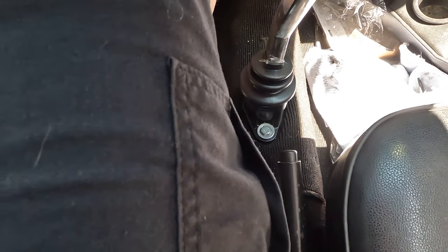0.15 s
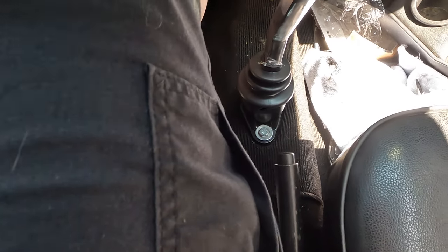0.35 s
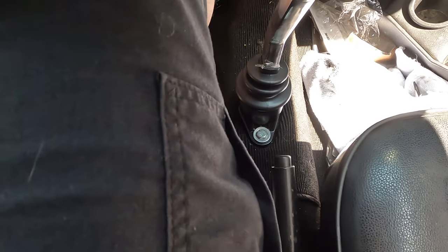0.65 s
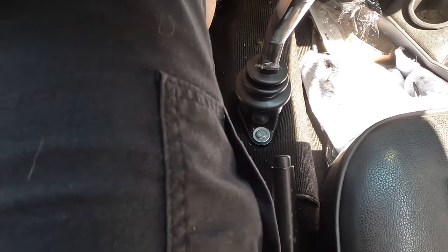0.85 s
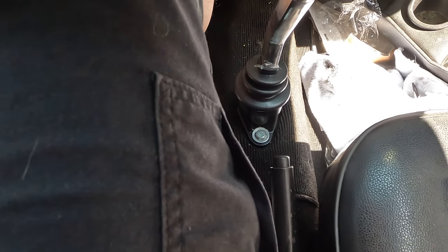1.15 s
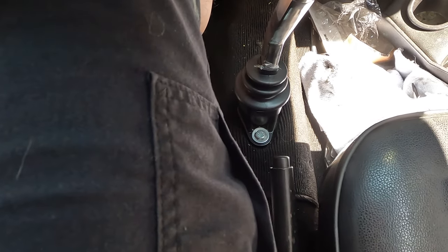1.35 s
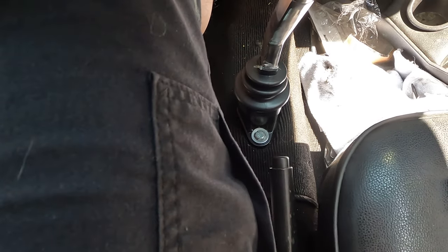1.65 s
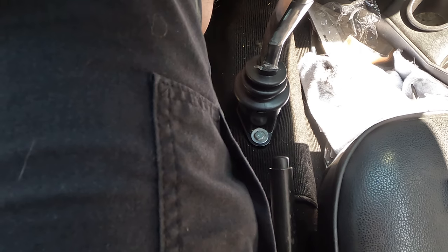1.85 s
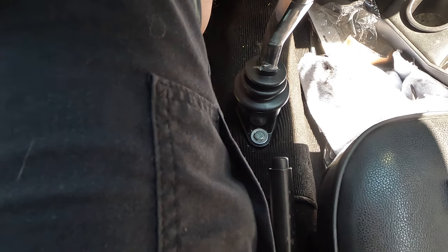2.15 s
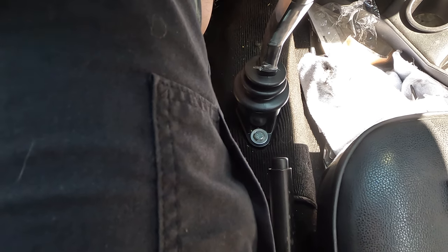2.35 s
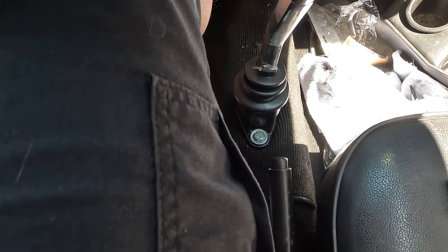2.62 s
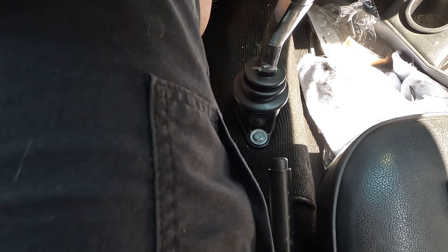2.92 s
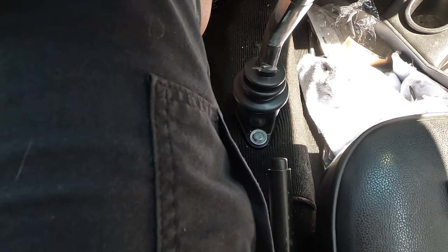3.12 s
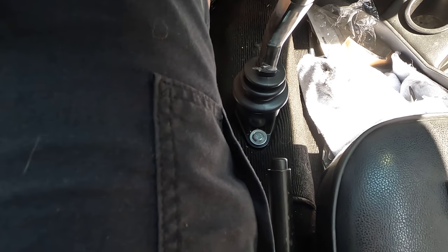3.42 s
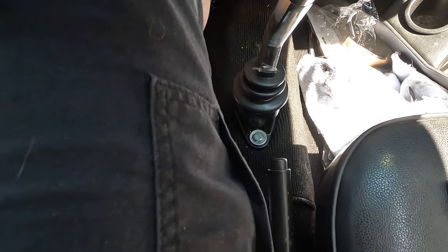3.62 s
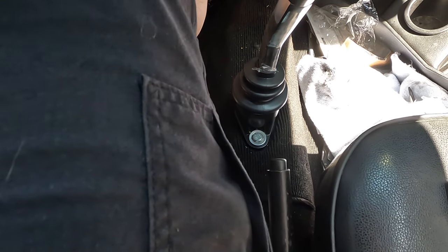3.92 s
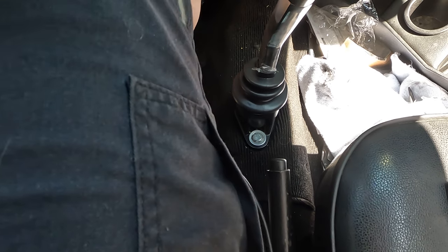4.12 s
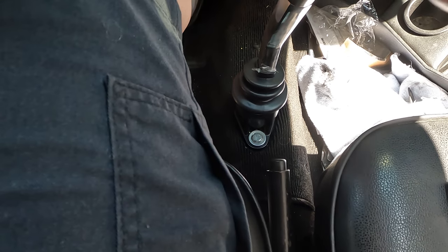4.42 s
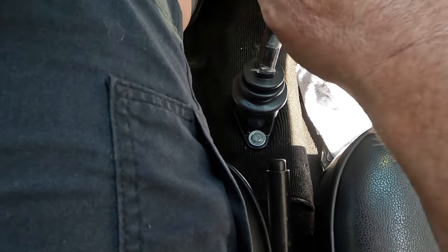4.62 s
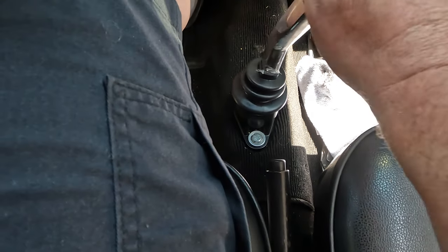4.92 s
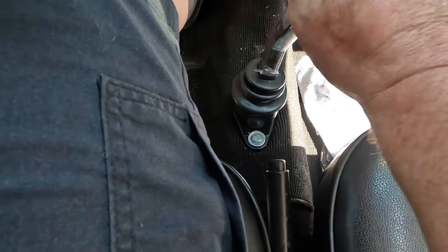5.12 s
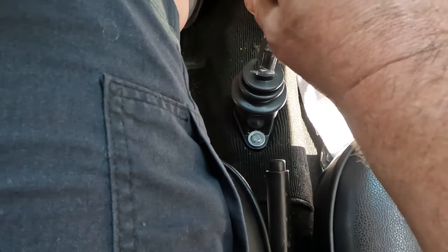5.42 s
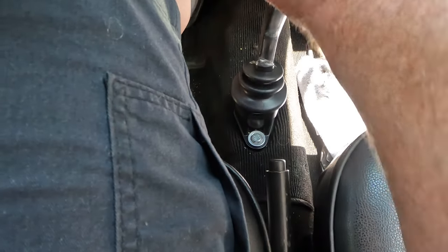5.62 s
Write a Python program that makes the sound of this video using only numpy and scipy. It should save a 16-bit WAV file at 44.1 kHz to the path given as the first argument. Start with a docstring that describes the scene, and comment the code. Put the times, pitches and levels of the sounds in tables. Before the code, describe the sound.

A low, muffled street rumble fills the cabin of a parked car. During the first second the driver settles with a few soft thumps and light taps. From about 1.2 seconds keys click and jingle in the ignition, close and slightly left. At 1.5 seconds the starter clunks in and grinds with a hoarse whine for half a second, then winds down without starting the engine. The keys clink again at 2 seconds, then rattle and jingle brightly, louder, from about 2.5 to 3.1. At 3.2 seconds the starter clunks and grinds a second time, and the four-cylinder engine catches at about 3.5. It flares briefly around 3.9 seconds, then sinks by 4.7 into a low, throbbing idle that continues to the end, near 5.8 seconds. One light, hollow tap comes at about 5 seconds. The space sounds small and dry.

```python
"""Inside a parked car, street rumble fills the cabin. The driver settles, and soft blows ring the floor pan.
Keys jingle and click in the lock, each impact exciting the modes of thin steel. The starter clunks in and
grinds in vain, its gear teeth driving the housing into resonance. The key is worked again, and on the
second try a four-cylinder engine catches, flares and idles: a pulse train filtered by the exhaust pipe."""
import sys
import numpy as np
from scipy import signal
from scipy.fft import rfft, irfft, next_fast_len
from scipy.io import wavfile
from scipy.ndimage import uniform_filter1d, map_coordinates

SR = 44100
rng = np.random.default_rng(int(sys.argv[2]) if len(sys.argv) > 2 else 0)


def dump(signal):
    """Clip the signal to [-1, 1] and save it as 16-bit WAV at the path in sys.argv[1]."""
    limited = np.clip(np.atleast_2d(signal).T, -1, 1)
    pcm = np.round(limited * 32767).astype(np.int16)
    wavfile.write(sys.argv[1], SR, pcm)


N = 254456


def amp(db):
    """Decibels to amplitude ratio."""
    return 10 ** (np.asarray(db) / 20)


def unit(x):
    """Normalisation to rms 1."""
    return x / np.sqrt(np.mean(x ** 2) + 1e-20)


def along(points, hz):
    """Interpolation on a logarithmic frequency axis."""
    f, v = np.transpose(points)
    return np.interp(np.log(hz + 1), np.log(f + 1), v)


def curves(rows):
    """Linear interpolation in time, one curve per column."""
    s, *cols = np.transpose(rows)
    return [np.interp(np.arange(N) / SR, s, c) for c in cols]


def during(t0, t1, fade=0.016):
    """A gate with linear ramps."""
    t = np.arange(N) / SR
    return np.clip(np.minimum(t - t0, t1 - t) / fade, 0, 1)


def wobble(rate):
    """Smooth random modulation, rate knots a second."""
    return map_coordinates(rng.standard_normal(int(N * rate / SR) + 4), [np.arange(N) * rate / SR])


def filtered(x, response):
    """Linear filtering: the spectrum times a frequency response."""
    m = next_fast_len(x.shape[-1] + SR // 4)
    return irfft(rfft(x, m) * response(np.fft.rfftfreq(m, 1 / SR)), m)[..., :x.shape[-1]]


def resonant(modes, passes=1):
    """Modal superposition of (frequency, bandwidth, gain) resonances, cascaded passes times."""
    return lambda f: sum((-1) ** k * amp(db) * 1j * f * width / (hz * hz - f * f + 1j * f * width)
                         for k, (hz, width, db) in enumerate(modes)) ** passes


def grit(t):
    """Partly coherent stereo white noise."""
    return rng.standard_normal(len(t)) + .5 * rng.standard_normal((2, len(t)))


# Likeness of left and right in the cabin: (frequency [Hz], correlation [ratio])
COHERENCE = [(40, 0.97), (100, .998), (500, 0.89), (1500, 0.6), (8000, 0.62), (15000, 0.32)]
def rush(spectrum, patchy_db, coherence=COHERENCE):
    """Shaped noise of rms 1 with patches of random gain; the mid-side ratio sets its coherence."""
    bins = signal.stft(rng.standard_normal((2, N)), nperseg=512)[2]
    patches = uniform_filter1d(uniform_filter1d(rng.standard_normal(bins.shape[1:]), 6, 0), 10, 1)
    pair = signal.istft(bins * amp(patchy_db * unit(patches)), nperseg=512)[1][:, :N]
    turn = lambda hz: np.arccos(np.clip(along(coherence, hz), -1, 1)) / 2
    mid, side = filtered(pair, lambda hz: amp(along(spectrum, hz)) * [np.cos(turn(hz)), np.sin(turn(hz))])
    return unit(np.array([mid + side, mid - side]))


# Street noise; the hiss also swells as the key is worked: (time [s], rumble level [dB], hiss level [dB])
STREET_LEVELS = [(0, -25, -46), (.8, -28, -54), (1.15, -29, -60), (1.5, -28, -43.5), (2.3, -29.5, -69),
                 (3.1, -25.5, -32.5)]
# Spectra of the rumble and the hiss: (frequency [Hz], relative density [dB])
RUMBLE_SPECTRUM = [(12, -53.5), (20, -5), (76, -5), (136, -15.5), (498, -35), (990, -33), (1900, -47),
                   (3300, -120)]
HISS_SPECTRUM = [(410, -0.5), (700, -15.5), (2590, -13.5), (4520, -17.5), (12000, -34.5), (15500, -59)]
def street():
    """Transmission through the body favours the bass of distant traffic; it fades as the engine starts."""
    rumble_db, hiss_db = curves(STREET_LEVELS)
    rumble = amp(rumble_db) * rush(RUMBLE_SPECTRUM, patchy_db=2.5) * during(-1, 3.57, fade=0.13)
    hiss = amp(hiss_db) * rush(HISS_SPECTRUM, patchy_db=2.5) * during(-1, 3.25, fade=0.023)
    return rumble + hiss


def cabin(x):
    """Reverberation: absorbent upholstery leaves only a brief exponential tail."""
    t = np.arange(SR // 6) / SR
    tail = rng.standard_normal((2, len(t))) * amp(-60 * t / .09)
    return signal.fftconvolve(x, tail / np.linalg.norm(tail[0]), axes=1)[:, :N]


# Light taps on trim and lever: (time [s], peak level [dB], pitch [Hz])
TRIM_TAPS = [(.074, -24.5, 585), (0.13, -32, 2600), (0.281, -37, 1990), (1.32, -25.5, 401),
             (4.952, -23.5, 438), (5.466, -44, 6200)]
def taps():
    """Damped resonance: a brief rough contact rings a hollow note and a broad overtone."""
    out, t = np.zeros(N + SR), np.arange(SR // 8) / SR
    for s, db, hz in TRIM_TAPS:
        contact = amp(-60 * t / 0.073) * rng.standard_normal(len(t))
        note = filtered(contact, resonant([(hz, .16 * hz, 0), (2.3 * hz, 2.6 * hz, -9.5)], passes=2))
        out[round(s * SR):][:len(t)] += amp(db) * note / np.abs(note).max()
    return out[:N]


# Soft blows on seat, pedal and floor: (time [s], gain [dB], thud gain [dB], rasp gain [dB])
DRIVER_BLOWS = [(0.071, -23.5, 8.5, -14.5), (0.37, -22, -4, -13.5), (0.593, -24, 3.5, -22.5),
                (0.909, -30, -14, -11.5), (0.936, -17.5, 11.5, -26), (1.267, -33.5, -13, -5),
                (1.316, -34, -16, -0.5), (2.664, -26.5, -10, -2)]
# Floor pan modes: (frequency [Hz], bandwidth [Hz], gain [dB])
PAN_MODES = [(91, 6.9, 0), (211, 70, 1), (307.7, 38.5, 4.5), (426, 36, -1), (614, 20, -6.5)]
# Rough contact, in blows and gear teeth alike: (frequency [Hz], relative density [dB])
GRIND_SPECTRUM = [(100, -46.5), (330, -7.5), (580, -18.5), (1150, -14.5), (2400, -20.5), (6500, -25.5),
                  (8200, -35), (15600, -41.5)]
def thumps(blows):
    """Impact excitation of the floor pan: its lowest mode thuds, and harder blows rasp more brightly."""
    out, t = np.zeros((2, N + SR)), np.arange(SR // 4) / SR
    envelope = amp(-60 * t / 0.15) * (1 - np.exp(-t / 0.0022))
    upper_modes = lambda hz: resonant(PAN_MODES[1:])(hz) / (1 + 1j * hz / 900) ** 2
    for s, db, thud_db, rasp_db in blows:
        push = envelope * rng.standard_normal(len(t))
        knock = amp(-16) * unit(filtered(push, upper_modes))
        thud = amp(thud_db - 19.5) * unit(filtered(envelope ** 3, resonant(PAN_MODES[:1])))
        cutoff_hz = 3500 * amp(db + 20.5)
        dull = lambda hz: amp(along(GRIND_SPECTRUM, hz)) * (hz > 400) / (1 + (hz / cutoff_hz) ** 2)
        rasp = amp(rasp_db + 4.5 + np.array([[1], [-1]])) * envelope * unit(filtered(grit(t), dull))
        out[:, round(s * SR):][:, :len(t)] += amp(db) * (knock + thud + rasp)
    return out[:, :N]


# Two groups of key modes: (frequency [Hz], relative level [dB], nominal 60 dB decay time [s])
LOW_KEY_MODES = [(4870, -9, .05), (6150, -5, .04), (7110, 0, .07)]
HIGH_KEY_MODES = [(10450, 0, .08), (10800, -1, .07), (11900, -4, .04), (13650, -8, .05), (14880, -5, .06)]
def chime(modes, t):
    """Free vibration of thin steel, new at each strike and roughened by re-touches, over a clatter."""
    decay_scale = amp(rng.normal(-2, 2))
    strike_db = rng.normal(0, 5, len(modes))
    ring = 0
    for (hz, db, t60), extra_db in zip(modes, strike_db):
        cycles = hz * rng.normal(1, 0.0164) * t + rng.random((2, 1)) * hz / 40000
        ring += amp(db + extra_db - 60 * t / (t60 * decay_scale)) * np.sin(2 * np.pi * cycles)
    tremble = .7 + np.interp(t, t[::80], rng.standard_normal(len(t[::80])))
    clatter = unit(filtered(grit(t), resonant([(hz, 1100, db / 2) for hz, db, _ in modes], passes=2)))
    return ring * tremble / np.abs(ring).max() + amp(-6 - 60 * t / 0.061) * clatter


# The bunch swings loose: (start [s], end [s], gain [dB])
KEY_SWINGS = [(2.025, 2.35, -70), (2.662, 2.875, -49.5), (2.93, 3.205, -47.5)]
def jingle(touches_per_s=300, bandwidth_hz=340):
    """Random impacts, in clumps, ring key modes broadened by the damping of neighbouring keys."""
    level = sum(amp(db) * during(t0, t1, 0.013) for t0, t1, db in KEY_SWINGS)
    out = 0
    for hz, db, _ in LOW_KEY_MODES + HIGH_KEY_MODES:
        touches = (rng.random(N) < touches_per_s / SR) * rng.standard_normal(N)
        clumped = touches * amp(6 * wobble(60))
        out += amp(db) * unit(filtered(clumped, resonant([(hz, bandwidth_hz, 0)], passes=2)))
    return level * out * amp([[2], [-2]])


# Key and lock contacts: (time [s], rattle gain [dB], low chime gain [dB], high chime gain [dB])
KEY_CONTACTS = [(0.126, -21.5, -36, -47), (0.3107, -22.5, -47, -66), (1.1666, -21, -18.5, -37),
                (1.18, -17.5, -21, -29), (1.199, -26, -25, -20.5), (1.286, -24.5, -29, -31.5),
                (1.3138, -12.5, -23, -46), (1.412, -22, -26.5, -37), (1.4763, -17.5, -32, -35),
                (2.061, -24, -19, -23.5), (2.1236, -23.5, -31, -34.5), (2.4636, -25, -61, -70),
                (2.5602, -15, -42, -51), (2.657, -16.5, -39, -37), (2.6825, -14.5, -13.5, -28),
                (2.7036, -9, -33, -35), (2.7385, -21.5, -34, -38), (2.767, -20.5, -40, -36),
                (2.805, -17, -7, -27), (2.843, -11.5, -12.5, -22.5), (2.9272, -16, -14, -22),
                (3.0079, -2, -15, -22), (3.029, -7, -15, -16), (3.074, -9, -19, -18.5),
                (3.114, -6.5, -13.5, -20), (3.138, -40, -33, -15)]
# Their rattle: (frequency [Hz], relative density [dB])
RATTLE_SPECTRUM = [(700, -5.5), (1300, -5), (2700, -5.5), (4800, -10.5), (6500, -17.5), (13000, -31.5)]
# Hard knocks of key on key or lock: (time [s], peak level [dB], pitch [Hz])
KEY_KNOCKS = [(2.466, -29, 2700), (2.563, -26.5, 2650), (2.6866, -17, 3500), (2.7075, -23, 2740),
              (2.7435, -18, 6500), (2.8073, -5, 5370), (2.9272, -21, 6560), (3.008, -17, 2900),
              (3.022, -12, 5130), (3.1172, -11, 6800)]
def keys():
    """Impact sound, a little to the left: a broadband rattle and modal ringing; hard knocks add a tick."""
    out, t = np.zeros((2, N + SR)), np.arange(SR // 6) / SR
    rise = (1 - np.exp(-t / 0.0026)) ** 2
    for s, rattle_db, low_db, high_db in KEY_CONTACTS:
        noise = unit(filtered(grit(t), lambda hz: amp(along(RATTLE_SPECTRUM, hz))))
        rattle = amp(rattle_db - 14.5 - 60 * t / 0.075) * noise
        low = amp(low_db - 7.5) * chime(LOW_KEY_MODES, t)
        high = amp(high_db + np.array([[2.5], [-1]])) * chime(HIGH_KEY_MODES, t)
        out[:, round(s * SR):][:, :len(t)] += rise * (rattle + low + high) * amp([[.8], [-.8]])
    for s, db, hz in KEY_KNOCKS:
        snap = amp(-60 * t / .005) * rng.standard_normal(len(t))
        tick = filtered(snap, resonant([(hz, .33 * hz, 0)], passes=2))
        out[:, round(s * SR):][:, :len(t)] += amp(db) * tick / np.abs(tick).max()
    return out[:, :N]


# Tries at the starter:
# (pinion touch [s], slam [s], slam gain [dB], motor surge [s], key release [s], grind gain [dB])
START_TRIES = [(1.519, 1.533, -9, 1.865, 1.968, -35), (3.163, 3.173, -9, 3.355, 3.716, -42)]
def pinion_blows():
    """Impact and rebound: the pinion touches, slams home and bounces, giving rows for thumps()."""
    blows = []
    for touch, slam, db, *_ in START_TRIES:
        blows += [(touch, db - 6.5, -1, -10), (slam, db, 0.57, -12), (slam + .02, db - 10, 11, -26.5)]
    return blows


def cranking(surge_db=9, settle_s=0.1, drop_out_db=-6, coast_db_per_s=-57, jolt_t60_s=1):
    """Exponential decay of grind and shake: the motor surges, settles and coasts; a slam jolts the block."""
    t = np.arange(N) / SR
    grind, jolt = np.zeros(N), np.zeros(N)
    for touch, slam, slam_db, surge, release, db in START_TRIES:
        free_db = surge_db * during(surge, 9, 0.017) * np.exp(-np.clip(t - surge, 0, None) / settle_s)
        coast_db = drop_out_db * during(release, 9, .04) + coast_db_per_s * np.clip(t - release, 0, None)
        grind += during(touch, 9) * amp(db + free_db + coast_db)
        jolt += during(slam, 9, 0.018) * amp(slam_db - 6 - 60 * np.abs(t - slam) / jolt_t60_s)
    return grind, np.hypot(jolt, amp(9.5) * grind)


# Starter motor whine: (time [s], frequency [Hz])
MOTOR_PITCH = [(1.68, 303.3), (1.8, 400), (1.95, 433.3), (3.3, 577), (3.38, 542), (3.45, 400.4)]
# Shaking engine block: (frequency [Hz], relative density [dB])
SHUDDER_SPECTRUM = [(12, -18.5), (20, -5), (103, 4.5), (166, -14), (320, -20), (550, -120)]
# Starter housing modes: (frequency [Hz], gain per pass [dB])
HOUSING_MODES = [(583, 0.5), (786, -6.5), (1004, -1), (1175, -3)]
def starter():
    """Forced vibration: teeth grind and ring the housing, block and floor pan shake, the motor whines."""
    level, shake = cranking()
    teeth = amp(1.8 * wobble(250))
    grind = amp(3.5 + np.array([[.8], [-.8]])) * unit(teeth * rush(GRIND_SPECTRUM, patchy_db=1))
    shudder = rush(SHUDDER_SPECTRUM, patchy_db=2.5)
    swell = amp(2.5 * wobble(16))
    hum = amp(-8) * swell * unit(filtered(rng.standard_normal(N), resonant(PAN_MODES[1:], passes=2)))
    phase = 2 * np.pi * np.cumsum(curves(MOTOR_PITCH)[0]) / SR
    whine = amp(-1.5) * unit(wobble(30) * np.sin(phase))  # random modulation makes it hoarse
    housing = resonant([(hz, 34, db) for hz, db in HOUSING_MODES], passes=2)
    ring = amp(-5) * unit(swell * filtered(teeth * rng.standard_normal(N), housing))
    return level * (grind + whine + ring) + shake * (hum + shudder)


# Uneven exhaust branches, one per cylinder: (relative level [dB])
BRANCH_LEVELS = [12, 2.5, 11.3, 11.2]
# Exhaust pipe modes: (frequency [Hz], bandwidth [Hz], gain [dB])
PIPE_MODES = [(85.2, 22.8, 5), (168.9, 16, 0), (280, 14, -25)]
def exhaust(firings, jitter_s=.0008, echo_s=.029):
    """Pipe resonance: each firing sends a pulse and its tail-pipe reflection through a low-pass silencer."""
    onsets = np.flatnonzero(np.diff(np.floor(firings)))
    size_scatter, time_scatter, echo_scatter = rng.standard_normal((len(onsets), 3)).T
    cylinder = np.floor(firings[onsets + 1]).astype(int) % 4
    size = amp(np.take(BRANCH_LEVELS, cylinder) + 1.5 * size_scatter)
    pulses = np.zeros(N + SR)
    pulses[onsets + np.round(time_scatter * jitter_s * SR).astype(int)] = size
    pulses[onsets + round(echo_s * SR)] += 0.42 * size * amp(2 * echo_scatter)
    return unit(filtered(pulses[:N], lambda hz: resonant(PIPE_MODES)(hz) / (1 + 1j * hz / 260) ** 2))


# Catch, flare and idle: (time [s], firing rate [Hz], boom level [dB])
ENGINE_RUN = [(3.471, 32, -13), (3.738, 39, -21), (3.831, 45.2, -23.5), (3.948, 44.3, -19),
              (4.079, 39.5, -18), (4.27, 33.1, -19.5), (4.669, 25.2, -18.5), (4.794, 24.9, -21.5),
              (5.198, 26.8, -16.5), (5.77, 30, -19)]
# Spectra of the valve gear and of a leak: (frequency [Hz], relative density [dB])
VALVE_SPECTRUM = [(110, -52), (200, -4.5), (440, -13.5), (900, -24.5), (2050, -29.5), (2500, -32),
                  (3180, -32), (3800, -37.5), (8000, -49), (10000, -71.5)]
LEAK_SPECTRUM = [(5500, -6), (11500, -9), (12200, 0), (13000, -9), (14500, -7)]
def engine(idle_hz=30, strong_firing_s=5.092):
    """Periodic combustion booms at the firing rate; exhaust, valves and leak grow with speed and effort."""
    catch_s = ENGINE_RUN[0][0]
    rate, boom_db = curves(ENGINE_RUN)
    effort = uniform_filter1d(np.gradient(rate) * SR, round(.08 * SR))  # smoothed acceleration [Hz/s]
    bark_db = -19.5 + 0.075 * (rate - idle_hz) + 0.078 * effort
    bark_db -= 8 * during(-1, catch_s + 0.22, 0.047)  # the first firings are weak
    valve_db = -37 + 0.28 * (rate - idle_hz) + 0.093 * effort
    firings = np.cumsum(rate) / SR
    firings -= firings[round(strong_firing_s * SR)]
    bark = amp(bark_db) * exhaust(firings)
    sway = amp(2.8 * wobble(15))
    boom = amp(boom_db) * sway * np.sqrt(2) * np.sin(2 * np.pi * (firings - .12))
    valves = amp(valve_db) * rush(VALVE_SPECTRUM, patchy_db=2, coherence=[(100, 1.0)])
    puffs = amp(4.5 * np.cos(np.pi * firings / 2) + wobble(6))  # once every four firings
    leak = amp(valve_db - 26) * unit(puffs * rush(LEAK_SPECTRUM, patchy_db=2.5))
    return during(catch_s, 9) * (bark + boom + valves + leak)


def scene():
    """Superposition of all sources; only the keys reverberate."""
    bunch = keys() + jingle()
    blows = thumps(DRIVER_BLOWS + pinion_blows())
    return bunch + amp(-4.5) * cabin(bunch) + blows + taps() + street() + starter() + engine()


def record(dry, top_hz=15750):
    """Band limiting: the treble rolls off to nothing at top_hz."""
    return filtered(dry, lambda hz: np.clip((top_hz - hz) / 1400, 0, 1) ** 2)


dry = scene()
out = record(dry)
dump(out)
```